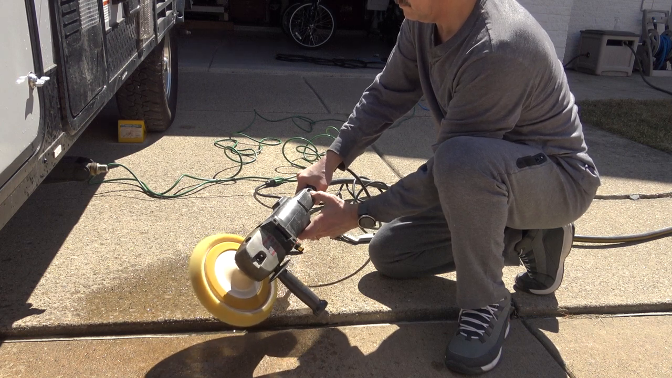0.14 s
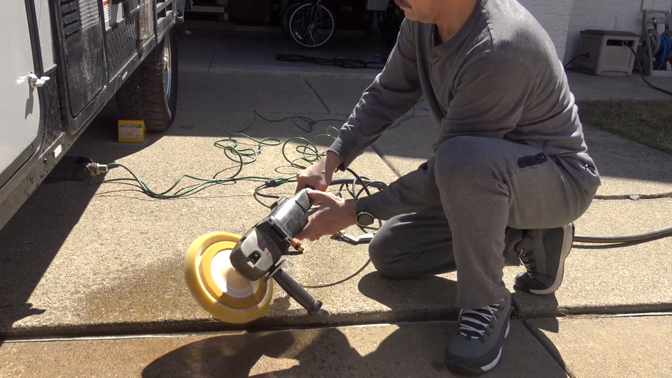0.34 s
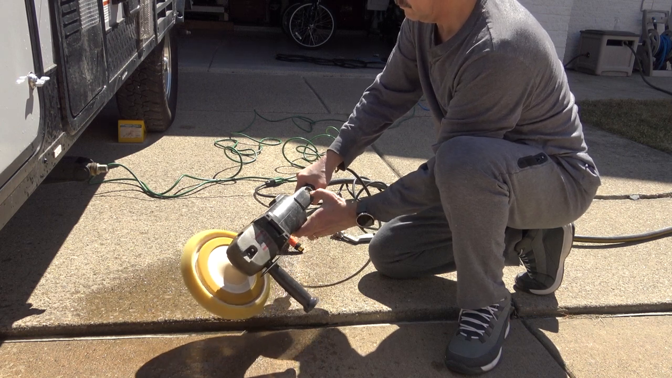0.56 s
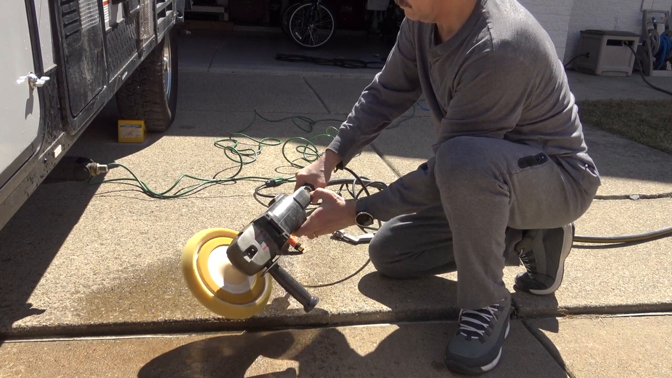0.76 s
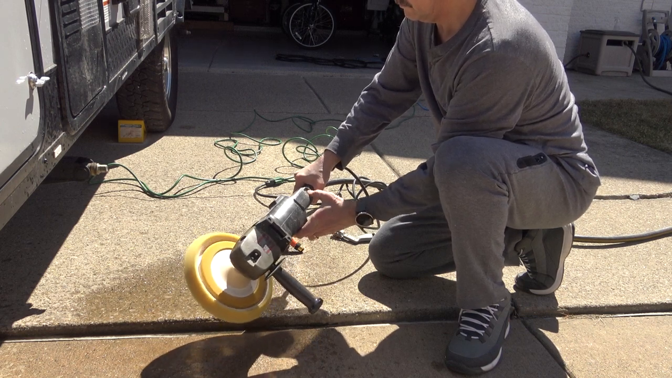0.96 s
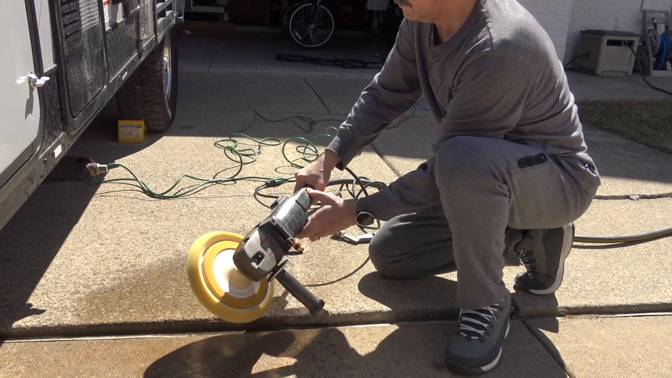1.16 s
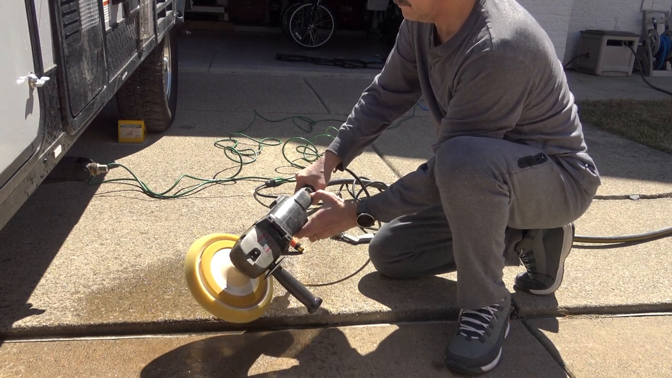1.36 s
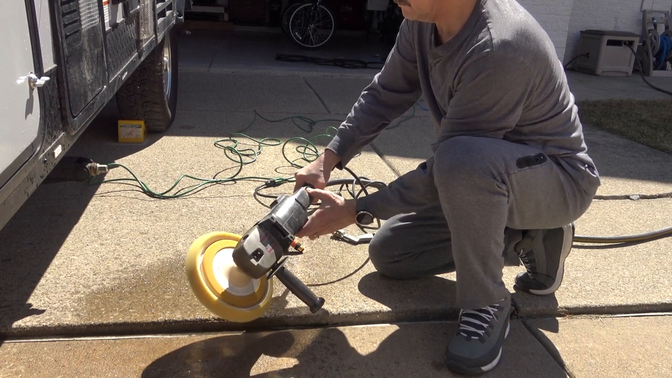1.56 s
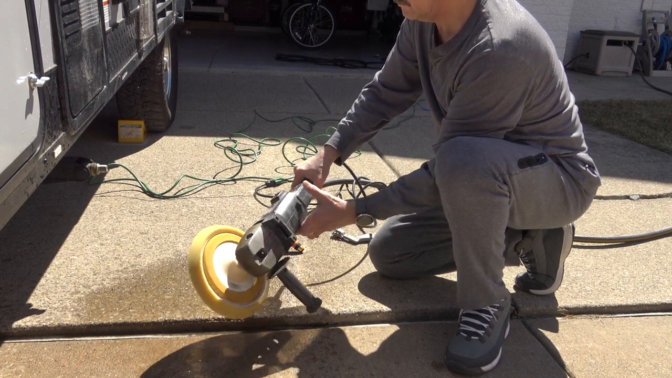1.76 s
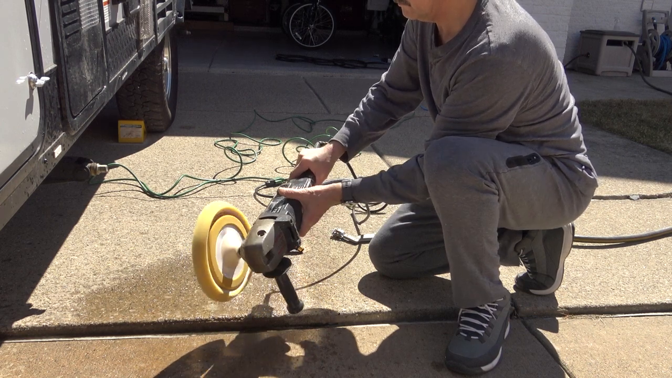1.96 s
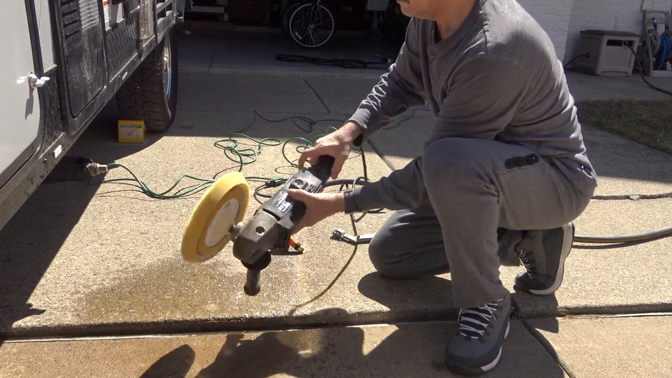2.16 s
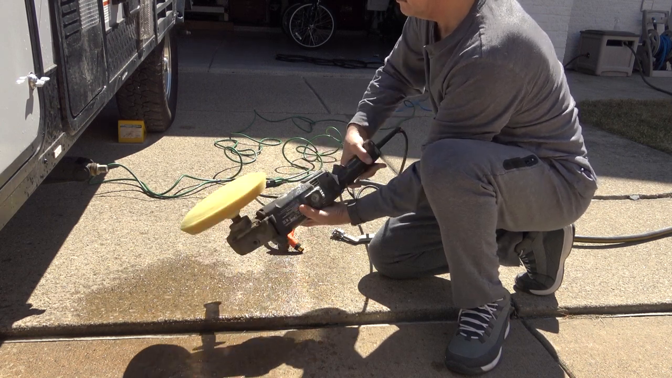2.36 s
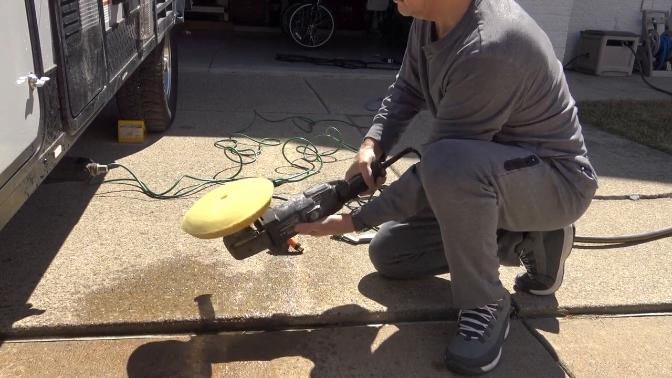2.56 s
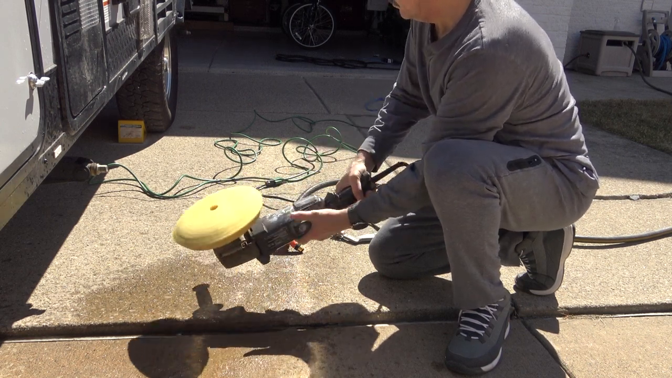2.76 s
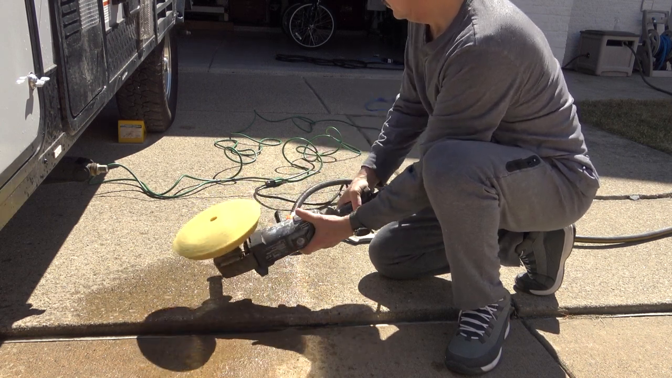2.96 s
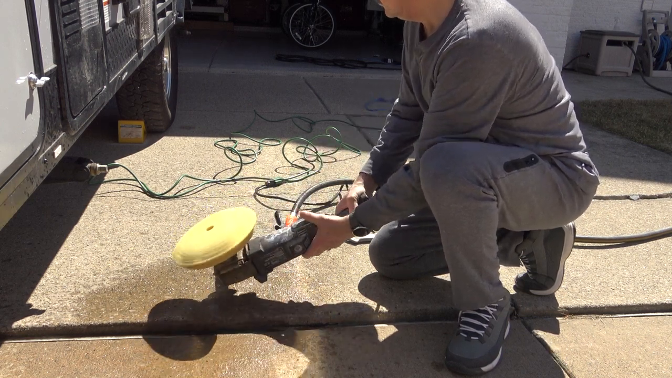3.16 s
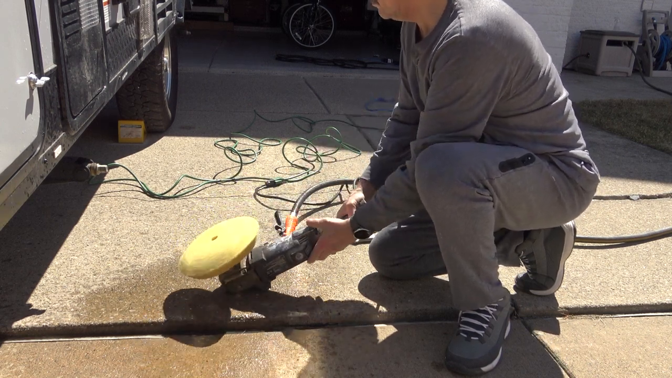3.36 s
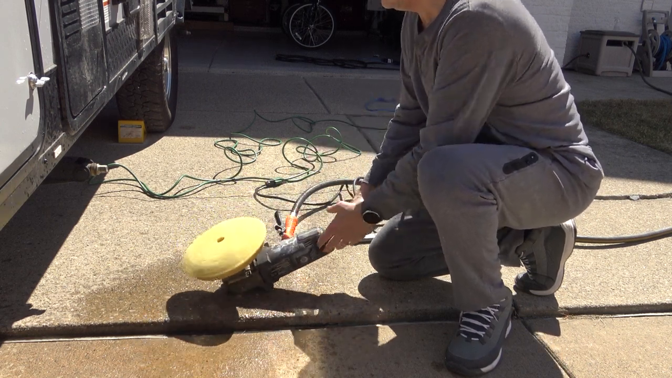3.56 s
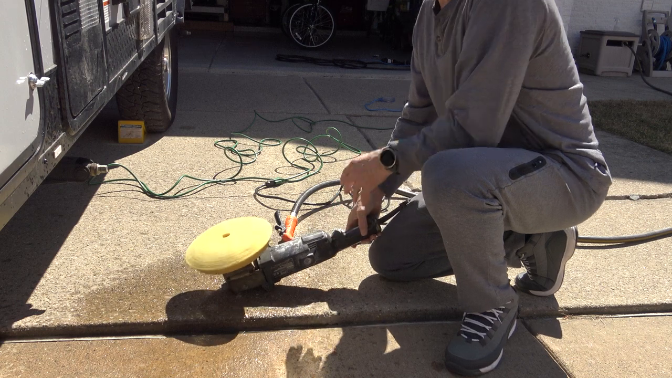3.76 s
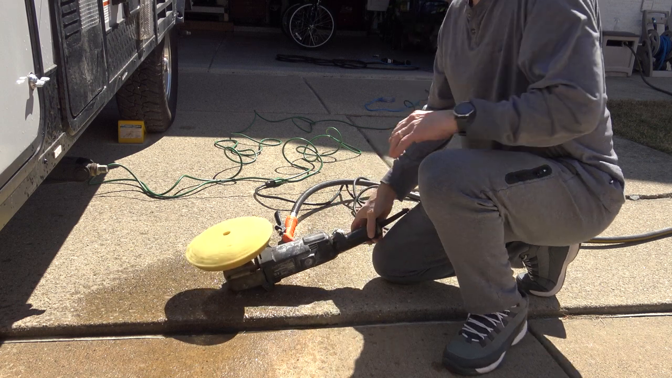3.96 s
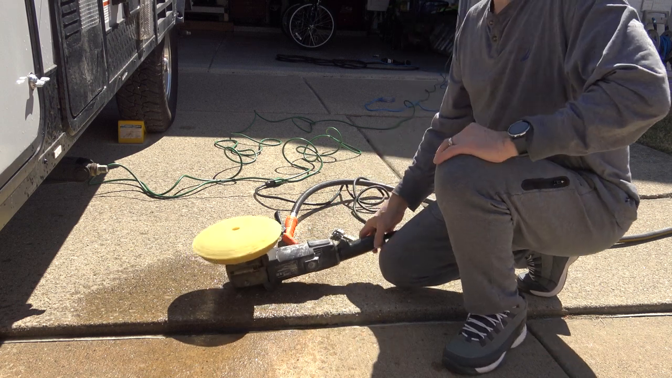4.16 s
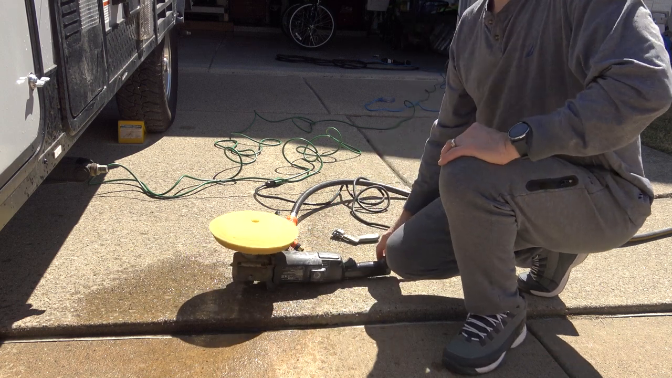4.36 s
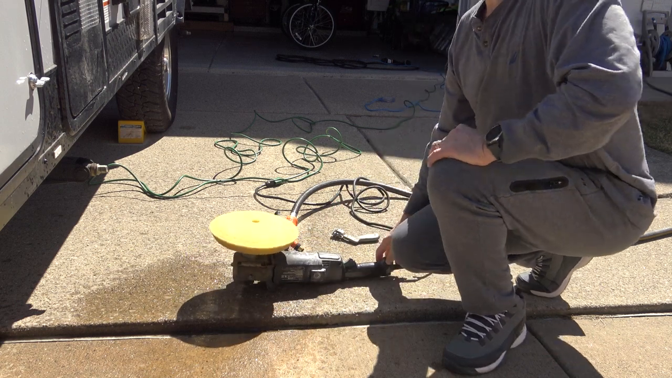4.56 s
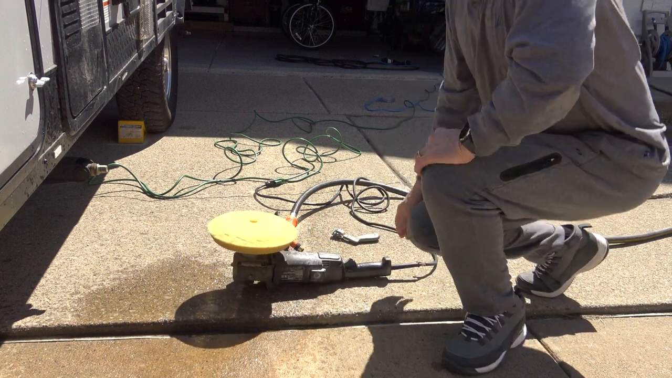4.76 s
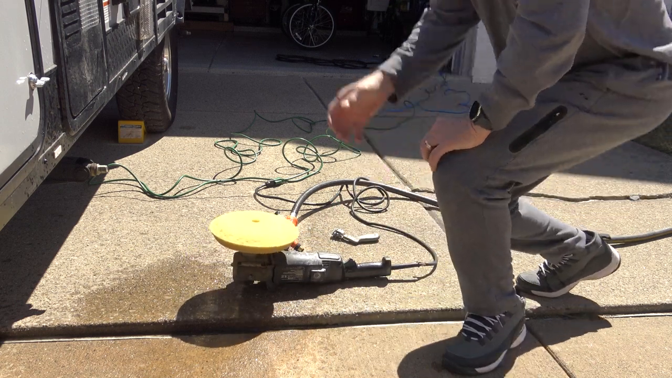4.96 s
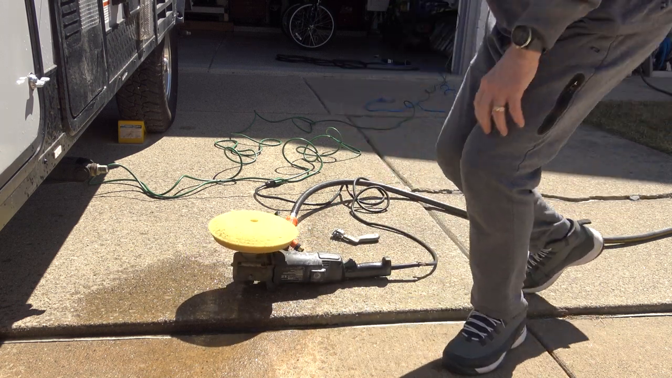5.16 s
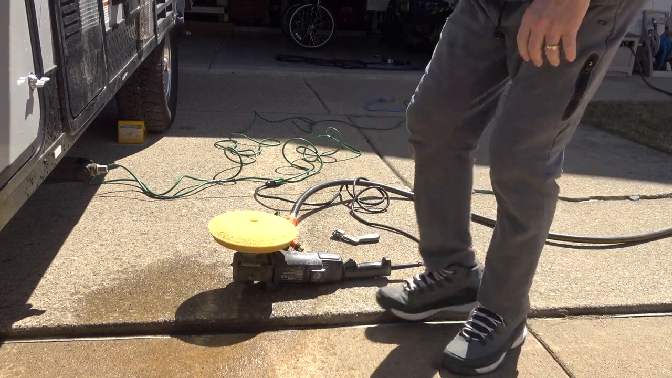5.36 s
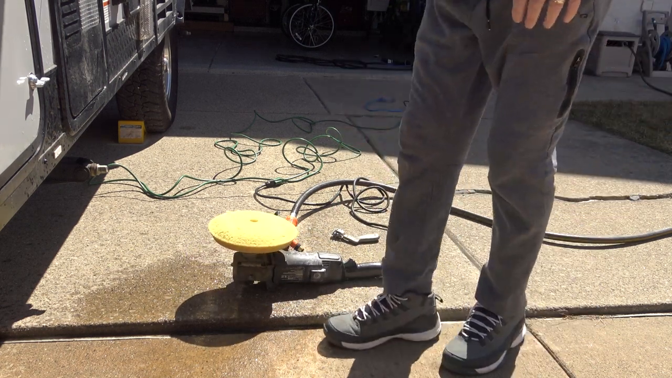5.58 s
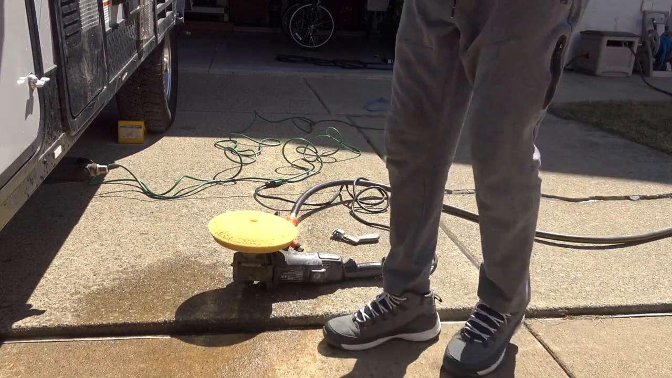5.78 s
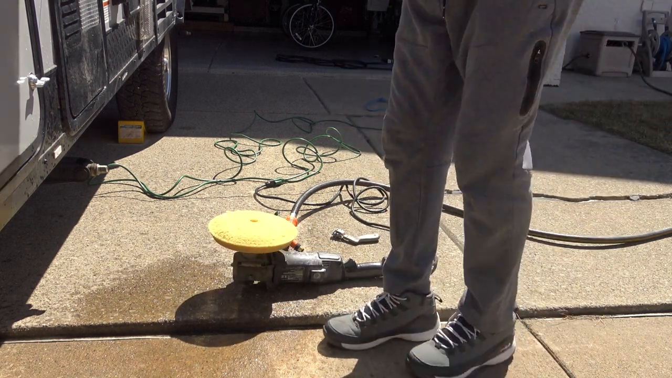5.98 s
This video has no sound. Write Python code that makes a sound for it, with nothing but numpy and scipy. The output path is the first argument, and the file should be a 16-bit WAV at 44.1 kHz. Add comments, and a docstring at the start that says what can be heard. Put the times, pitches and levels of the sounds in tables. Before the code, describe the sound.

Close by outdoors, a power polisher's shrill whine and fan rush sink steadily in pitch, gears clattering ever slower until it halts, followed by gritty footsteps.

```python
"""Armature whines and fan rush of a hand-held electric polisher, running free close to the microphone on a
concrete drive; it is switched off and coasts to a stop. Slots and commutator bars give near sines, fan and
rub are shaped noise, and the bevel gear sings once per spindle turn, then knocks in its slack. Afterwards
shoes shift on grit, slightly left; a low rumble of handling and wind and far outdoor hum lie below."""
import sys
import numpy as np
from scipy import signal
from scipy.fft import rfft, irfft
from scipy.io import wavfile
from scipy.ndimage import map_coordinates

SR = 44100
rng = np.random.default_rng(int(sys.argv[2]) if len(sys.argv) > 2 else 0)


def makeup_ratio(level_db):
    """Linear amplitude ratio for a level in decibels (20 dB per factor of ten)."""
    decades = np.asarray(level_db, float) / 20
    return 10 ** decades


def generate_wav(sig):
    """Save sig (samples, or channels by samples) to the path in sys.argv[1] as 16-bit PCM at SR."""
    pcm = np.round(np.clip(np.atleast_2d(sig).T, -1, 1) * 32767).astype(np.int16)
    wavfile.write(sys.argv[1], SR, pcm)


N = 265482

# low rumble of handling and wind at the microphone: start_s, level_db
LOW_RUMBLE_LEVEL = [(0.0, -54.5), (1.91, -75), (2.08, -39), (2.3, -53), (3.34, -46.5), (3.6, -31),
                    (3.74, -49), (3.97, -36), (4.06, -45), (4.29, -40), (4.66, -49), (5.31, -44.5),
                    (6.02, -47)]
# spectrum of that rumble: frequency_hz, density_db (relative, per Hz)
LOW_RUMBLE_SPECTRUM = [(12, -46), (20, -13), (48, 2), (97, 2.5), (187, -6), (290, -18), (480, -120)]
# far outdoor hum: frequency_hz, density_db (relative, per Hz)
OUTDOOR_SPECTRUM = [(150, -32.5), (400, -8.5), (900, -14), (1600, -21), (2600, -27), (6000, -33),
                    (16000, -40.5)]
OUTDOOR_DB = -48.5

# shoes on concrete: start_s, nominal peak_db, sole_hz at the start, grit_db against peak
SHOE_STEPS = [(5.561, -10, 477, -43), (5.583, -25, 303, -10), (5.799, -33.5, 185, -2),
              (5.82, -14.5, 240, -11), (5.848, -29, 272, -9), (5.903, -35, 191, 5.5), (5.93, -16, 282, -21)]

# the tool is set on the concrete: start_s, peak_db, thump_hz at the start
SET_DOWN_THUMPS = [(3.459, -16, 300), (3.483, -19, 386)]
# resonances of the casing on the ground: pitch_hz, width_hz, level_db
REST_RESONANCES = [(1470, 60, 6), (1760, 380, 2.5), (2284, 220, -3.5), (4960, 290, -17), (8800, 370, -22)]
# level of the rub ringing in them: start_s, level_db
REST_WHIRR_LEVEL = [(3.9, -51.5), (4.45, -27), (5.05, -36), (5.2, -42.5), (5.35, -61)]

# armature speed, coasting against steady friction plus fan drag between rows: start_s, turns_hz
ARMATURE_SPEED = [(0.0, 386.2), (0.25, 388.4), (0.38, 385.5), (0.5, 379), (0.7, 343.5), (1.0, 298.1),
                  (1.4, 250.5), (2.0, 196.0), (2.6, 151.9), (3.25, 112.0), (4.0, 71.3), (4.5, 44.4),
                  (4.72, 33.0), (4.82, 28.5), (4.92, 22.3), (5.3, 3)]
DRAG_EQUALS_FRICTION_HZ = 215
# broad sound of the machine: start_s, fan_rush_db, bearing_and_brush_rub_db
RUSH_AND_RUB = [(0.0, -18.5, -21.5), (0.75, -16.5, -17), (1.85, -28.5, -19), (2.56, -26.5, -23),
                (2.9, -47, -24.5), (3.58, -29, -24.5), (4.22, -35.5, -29.5), (4.95, -68, -41.5),
                (5.17, -57, -52), (5.4, -54, -67)]
# fan spectrum at full speed: frequency_hz, density_db (relative, per Hz)
FAN_SPECTRUM = [(150, -23), (770, -24), (1650, -12), (2400, 4), (3200, -3), (7500, -2.5), (10500, -7),
                (13000, -11.5), (16000, -15.5)]
# spectrum of the plain rub: frequency_hz, density_db (relative, per Hz)
RUB_SPECTRUM = [(150, -29), (300, -13), (600, -5), (1200, -3), (2000, -6), (3200, -6.5), (4350, -7),
                (5100, -7.5), (5900, -7.5), (7100, -7), (8300, -8.5), (9250, -11), (10000, -15),
                (12000, -19.5), (16000, -31)]
# resonances of the gear housing: pitch_hz, width_hz, level_db
HOUSING_RESONANCES = [(1840, 284, -0.5), (2598, 100, 9.5), (3274, 57, -14.5), (3580, 96, 3.5),
                      (5196, 680, -7), (8000, 790, -5.5)]
# gear song, fading as the drive load goes: start_s, level_db
SONG_LEVEL = [(0.0, -8), (0.75, -11.5), (1.2, -15.5), (1.85, -28), (3.5, -28.5), (4.3, -68)]
TURNS_PER_SPINDLE, FIRST_TIGHT_SPOT, PINION_TEETH = 9.144, 0.21, 6  # tight spot in spindle turns

# two strongest whines as the machine slows and is turned about: start_s, multiple_12_db, multiple_24_db
MAIN_WHINES = [(0.0, -19, -17), (0.45, -17, -20.5), (0.65, -27, -20.5), (1.02, -18.5, -16.5),
               (1.22, -24.5, -23.5), (1.45, -36, -26.5), (1.55, -32, -26), (1.75, -26.5, -30),
               (1.95, -30, -36), (2.25, -17.5, -31.5), (2.55, -32.5, -35), (2.85, -21.5, -35),
               (3.3, -35, -97), (3.45, -28.5, -37), (3.75, -33, -27.5), (4.05, -39, -43), (4.2, -28, -31.5),
               (4.5, -39, -42), (4.8, -55, -69), (4.95, -71, -44), (5.1, -66, -58)]
# next four, coming and going: start_s, multiple_30_db, multiple_36_db, multiple_42_db, multiple_48_db
CHANGING_WHINES = [(0.0, -44, -49, -56, -56), (1.05, -42, -47, -56, -56), (1.3, -40, -33, -52, -56),
                   (1.62, -43, -39, -58, -50), (1.94, -43, -26, -48, -46), (2.05, -41, -34, -47, -40),
                   (2.22, -40, -43, -55, -49), (2.36, -37, -33, -46, -40), (2.5, -35, -31, -35, -54),
                   (2.65, -33, -44, -29, -50), (2.82, -31, -44, -30, -45), (2.98, -29, -39, -42, -34),
                   (3.15, -42, -45, -46, -42), (3.55, -42, -42, -39, -44), (3.76, -39, -32, -50, -41),
                   (4.2, -36, -36, -44, -50), (4.44, -38, -34, -44, -38), (4.6, -46, -40, -39, -50),
                   (4.76, -56, -52, -46, -40), (4.87, -60, -58, -54, -50), (5.1, -70, -70, -60, -56)]
# weaker whines: multiple of armature turns, level_db at full speed before the casing
WEAK_WHINES = [(18, -35), (54, -48), (60, -45)]
# rotor unbalance: multiple of armature turns, level_db at full speed
ROTOR_UNBALANCE = [(1, -41), (2, -38)]
# how well the casing radiates the weaker whines in the hand: frequency_hz, gain_db
CASING_IN_HAND = [(1500, -10), (2200, -4), (2700, -14), (3100, 0), (3600, -10), (4100, -2), (4700, -6),
                  (5300, 3), (6100, -8), (8200, -1.5), (10500, -7.5), (15000, -32)]
# how well it radiates them lying on the concrete: frequency_hz, gain_db
CASING_ON_GROUND = [(600, -15), (1440, 5), (1900, 0), (2350, 21), (2800, -5), (15000, -32)]
RESTS_FROM_S = 4.45

# knocks timed one by one, loud and faint, some once a spindle turn:
# start_s, nominal peak_db, thud_hz, clack_db against usual, loudest ring_hz
TIMED_KNOCKS = [(1.835, -26, 1330, -3, 2560), (1.874, -13, 1300, -4, 2470), (2.264, -17, 1080, 5, 3300),
                (2.405, -18, 890, 7, 3070), (2.432, -12, 840, -9, 1920), (2.451, -20, 1020, 13, 3000),
                (2.482, -9, 900, 4.5, 1900), (2.53, -21, 900, 8, 3050), (2.567, -6.5, 905, -2.5, 3160),
                (2.625, -9, 860, -1, 3050), (2.702, -18, 910, 6, 2630), (2.724, -10, 950, 2, 2613),
                (2.746, -2.5, 1250, -4.5, 2660), (2.766, -12.5, 870, 1, 2620), (2.819, -13, 790, 9.5, 1620),
                (2.858, -13, 695, 0, 3200), (2.879, -10.5, 780, 4, 2630), (2.928, -18, 920, 7, 3110),
                (2.946, -10, 890, 6, 1700), (2.992, -9.5, 690, -1.5, 3200), (3.017, -13.5, 885, 9, 1670),
                (3.09, -12.5, 845, 6.5, 1610), (3.141, -17, 690, 8, 3320), (3.167, -17, 910, 9, 3360),
                (3.188, -27, 900, 14, 3350), (3.243, -12.5, 740, -3, 3380), (3.262, -11.5, 1400, 0.5, 3330),
                (3.286, -10.5, 1300, 3.5, 3270), (3.339, -16, 1260, 3.5, 1770),
                (3.402, -10.5, 614, 0, 2600), (3.423, -13, 690, 8, 2680), (3.431, -6.5, 634, 2, 2930),
                (3.458, -6.5, 1130, -12, 2560), (3.483, -7.5, 706, -1.5, 2890),
                (3.536, -20.5, 1240, 10.5, 2590), (3.588, -6, 1030, -3, 1810), (3.801, -10, 874, -6, 2730),
                (3.819, -2, 970, -9, 2740), (3.829, -7.5, 907, 1, 1790), (3.858, -12, 940, -5, 3180),
                (3.887, -5, 944, -1.5, 1870), (4.013, -5, 860, -3.5, 1740), (4.037, -6, 910, -6, 1370),
                (4.057, -7.5, 854, -1, 1750), (4.078, -2.5, 944, -7, 2650), (4.091, -8, 830, -3, 1790),
                (4.111, -3, 930, -10, 2620), (4.127, -5, 765, -3, 1900), (4.175, -8, 830, 2, 1840),
                (4.199, -7.5, 757, -3, 1180), (4.213, -10, 694, 0.5, 2670), (4.238, -5.5, 960, -6.5, 1350),
                (4.254, -10, 706, -5, 1180), (4.315, -5.5, 655, -1, 1810), (4.347, -4.5, 1000, -10, 2790),
                (4.364, -8.5, 1280, 0, 1790), (4.385, -11, 980, -1, 1830), (4.415, -9.5, 690, 5, 2020),
                (4.437, -14.5, 680, 5, 950), (4.464, -11.5, 663, 1.5, 1730), (4.499, -14, 1360, 1, 1740),
                (4.54, -16, 690, -2, 1750), (4.666, -19, 990, -2, 1770), (4.716, -23, 1420, 11, 1790),
                (4.73, -16.5, 940, -2, 1830), (4.766, -18, 705, 3.5, 1840), (4.831, -13, 716, -11, 1520),
                (4.909, -16, 630, -11, 1170), (4.986, -14, 616, -6, 1420), (5.032, -14.5, 615, -7, 1450),
                (5.07, -12, 657, -6, 1710), (5.17, -22, 730, -6, 1520)]
# turns on which a weaker second knock leads: spindle turn number
LEADING_TURNS = [57, 58, 59, 63, 64, 65, 67]
# one slack knock on each of these spindle turns; before LIMP_ENDS odd ones are early, even ones late
KNOCK_TURNS, LIMP_ENDS = range(49, 77), 66
TURN_RING_HZ = 2556  # usual loudest ring of the housing


def rms_one(x):
    """Scales x to rms 1."""
    return x / np.sqrt(np.mean(x ** 2) + 1e-20)


def in_time(rows):
    """Draws each column of a timed table as a line through all samples."""
    s, *columns = np.transpose(rows)
    return [np.interp(np.arange(N) / SR, s, column) for column in columns]


def coloured(x, spectrum):
    """Gives x a spectrum drawn on a log-frequency axis; rms 1."""
    hz, level_db = np.transpose(spectrum)
    log_hz = np.log(np.arange(N // 2 + 1) * SR / N + 1)
    return rms_one(irfft(rfft(x) * makeup_ratio(np.interp(log_hz, np.log(hz), level_db)), N))


def drift(rate_hz):
    """Slow chance with rms 1: noise through a double low-pass pole."""
    r = np.exp(-2 * np.pi * rate_hz / SR)
    return rms_one(signal.lfilter([1], [1, -2 * r, r * r], rng.standard_normal(N + SR))[SR:])


def resonance(x, hz, width_hz):
    """One damped resonance, struck or driven by x."""
    r = np.exp(-np.pi * width_hz / SR)
    b = np.array([1, 0, -1]) * (1 - r * r) / 2
    return signal.lfilter(b, [1, -2 * r * np.cos(2 * np.pi * hz / SR), r * r], x + 1e-18)


def swell(rise_s, fall_s):
    """A short envelope of height 1 that rises and dies, with its time axis."""
    t = np.arange(SR // 16) / SR
    shape = (1 - np.exp(-t / rise_s)) ** 2 * np.exp(-t / fall_s)
    return t, shape / shape.max()


def background():
    """Low rumble of handling and wind at the microphone and a smooth far hum, nearly alike on both sides."""
    rumble_db, = in_time(LOW_RUMBLE_LEVEL)
    a, b, c, d = rng.standard_normal((4, N))
    sides = np.array([[1], [-1]])
    rumble = coloured(a, LOW_RUMBLE_SPECTRUM) + 0.08 * sides * coloured(b, LOW_RUMBLE_SPECTRUM)
    hum = coloured(c, OUTDOOR_SPECTRUM) + 0.16 * sides * coloured(d, OUTDOOR_SPECTRUM)
    return makeup_ratio(rumble_db) * rumble * makeup_ratio(-1.2 * sides) + makeup_ratio(OUTDOOR_DB) * hum * makeup_ratio(0.5 * sides)


def yard(x):
    """A few dull echoes from the vehicle side and house walls, other ones on each side."""
    dull = signal.lfilter([0.5], [1, -0.5], x)
    delays_s = np.array([[0.007, 0.019, 0.034], [0.011, 0.023, 0.041]])
    lags = (delays_s * SR).astype(int)
    return np.array([sum(np.roll(dull, lag) for lag in side) for side in lags])


def steps():
    """A sole pushes with a falling thump and a ring that grows with the grit; grit crunches under it."""
    out = np.zeros(N + SR)
    t, push = swell(0.0004, 0.0065)
    t, crunch = swell(0.00086, 0.007)
    bright = signal.butter(2, [1500, 9000], "band", fs=SR, output="sos")
    dull = signal.butter(2, [250, 900], "band", fs=SR, output="sos")
    noises = rng.standard_normal((len(SHOE_STEPS), len(t)))
    for (s, peak_db, hz, grit_db), noise in zip(SHOE_STEPS, noises):
        thump = np.sin(2 * np.pi * hz * t * (1 - 12.5 * t) + np.cumsum(noise) / 30)
        scuff = 1.5 * push * signal.sosfilt(dull, noise)
        ring = makeup_ratio(grit_db / 2 - 7) * np.sin(2 * np.pi * 1350 * t)
        sole = push * (thump + scuff + ring)
        unevenness = makeup_ratio(11.0 * signal.sosfilt(dull, noise[::-1]))
        grit = crunch * unevenness * signal.sosfilt(bright, noise)
        start = round(s * SR)
        out[start:start + len(t)] += makeup_ratio(peak_db - 7.0) * sole + makeup_ratio(peak_db + grit_db - 6.0) * grit
    return out[:N]


def set_down():
    """The tool meets the concrete with short dull thumps sinking in pitch."""
    out = np.zeros(N + SR)
    t, push = swell(0.00041, 0.0017)
    for s, peak_db, hz in SET_DOWN_THUMPS:
        start = round(s * SR)
        thump = push * np.sin(2 * np.pi * hz * t * (1 - 3.5 * t))
        out[start:start + len(t)] += makeup_ratio(peak_db) * thump
    return out[:N]


def armature_speed():
    """Under friction plus square-law drag the arctangent of speed falls evenly."""
    s, hz = np.transpose(ARMATURE_SPEED)
    slope, = in_time(np.transpose([s, np.arctan(hz / DRAG_EQUALS_FRICTION_HZ)]))
    return DRAG_EQUALS_FRICTION_HZ * np.tan(slope)


def housing(x):
    """The gear housing rings in all its resonances at once, with alternating sign."""
    return sum(makeup_ratio(db) * (-1) ** k * resonance(x, hz, width)
               for k, (hz, width, db) in enumerate(HOUSING_RESONANCES))


def rest_whirr():
    """Grains of the rub ring in the casing as it comes to lie on the ground."""
    level_db, = in_time(REST_WHIRR_LEVEL)
    grains = rng.standard_normal(N) * makeup_ratio(2.0 * drift(30))
    rings = sum(makeup_ratio(db) * resonance(grains, hz, width) for hz, width, db in REST_RESONANCES)
    return makeup_ratio(level_db) * rms_one(rings)


def brushes(speed, rub_db):
    """Brushes pass the same worn bars each half turn: faint even multiples, once the fan has slowed."""
    wear = rng.standard_normal((3, 80))  # three patterns of 80 points, each flickering by itself
    half_turns = 2 * np.cumsum(speed) / SR % 1
    buzz = sum(makeup_ratio(5 * drift(4.8)) * map_coordinates(bars, [half_turns * len(bars)], mode="grid-wrap")
               for bars in wear)
    casing = signal.butter(2, [1800, 6500], "band", fs=SR, output="sos")
    heard = np.clip((250 - speed) / 60, 0, 1)
    return makeup_ratio(rub_db - 14) * signal.sosfilt(casing, buzz) * heard


def rub(rub_db):
    """Dense uneven grains from brushes and bearings, partly sung by the housing."""
    grains = rng.standard_normal(N) * makeup_ratio(1.37 * drift(37))
    plain = coloured(grains, RUB_SPECTRUM)
    return makeup_ratio(rub_db) * rms_one(plain + 1.04 * housing(plain))


def fan(speed, rush_db):
    """Turbulence scales with the blades: its whole spectrum sinks with speed."""
    full = coloured(rng.standard_normal(N), FAN_SPECTRUM)
    slowed = map_coordinates(full, [np.cumsum(speed / speed.max())], order=3)
    return makeup_ratio(rush_db + 2.06 * drift(39)) * slowed


def gear_song(speed, song_db):
    """Six pinion teeth ring where the crown wheel runs tight, once a spindle turn, and shake the housing."""
    turns = np.cumsum(speed) / SR
    spindle = 2 * np.pi * (turns / TURNS_PER_SPINDLE + FIRST_TIGHT_SPOT + 0.04 * drift(20))
    tight = np.exp(10.0 * (np.cos(spindle) - 1)) + 0.19 * makeup_ratio(1.3 * drift(58))
    teeth = np.sin(2 * np.pi * PINION_TEETH * turns + 0.8 * drift(60))
    wobble_db = 1.5 * drift(20)
    shake = rms_one(housing(tight * rng.standard_normal(N)))
    return makeup_ratio(song_db + wobble_db) * (tight * teeth + 0.097 * shake)


def whines(speed):
    """Slots, bars and unbalance give near sines on multiples of the armature turns, with drifting level."""
    angle = 2 * np.pi * np.cumsum(speed) / SR
    resting = np.arange(N) / SR > RESTS_FROM_S
    halvings = np.log2(speed / speed.max())  # negative as it slows
    levels = in_time(MAIN_WHINES) + in_time(CHANGING_WHINES)
    voices = [(k, db + 2 * drift(14)) for k, db in zip((12, 24, 30, 36, 42, 48), levels)]
    for k, db in WEAK_WHINES:
        in_hand_db = np.interp(k * speed, *np.transpose(CASING_IN_HAND))
        on_ground_db = np.interp(k * speed, *np.transpose(CASING_ON_GROUND))
        casing_db = np.where(resting, on_ground_db, in_hand_db)
        voices.append((k, db + 1.5 * halvings + casing_db + 4 * drift(7)))
    voices += [(k, db + 7 * halvings + drift(3)) for k, db in ROTOR_UNBALANCE]
    out = 0
    for k, level_db in voices:
        audible = np.clip((15800 - k * speed) / 500, 0, 1)  # silent above 15.8 kHz
        phase = k * angle + (0.3 + 0.012 * k) * drift(30)
        out = out + np.sqrt(2) * audible * makeup_ratio(level_db) * np.sin(phase)
    return out


def thud_pitch(speed):
    """The thud follows the tooth rate, but the housing sets a floor under it."""
    lowest_hz = 1082
    return np.maximum(PINION_TEETH * speed, lowest_hz)


def turn_knocks(speed, spindle):
    """Slack is taken up once a spindle turn, limping at first: rows of start_s, peak_db, thud_hz."""
    turn = np.array(KNOCK_TURNS)
    limp = np.where(turn % 2, -0.05, 0.06) * (turn < LIMP_ENDS)  # in spindle turns
    s = np.interp(turn + limp, spindle, np.arange(N) / SR)
    level, pitch = rng.standard_normal((len(turn), 2)).T
    thud_hz = thud_pitch(speed[(s * SR).astype(int)]) * (1 + 0.08 * pitch)
    return np.transpose([s, -6 + 1.2 * level, thud_hz])


def leading_knocks(speed, spindle):
    """A weaker knock comes a third of a turn ahead: rows of start_s, peak_db, thud_hz."""
    s = np.interp(np.array(LEADING_TURNS) - 0.34, spindle, np.arange(N) / SR)
    return [(at, -11, thud_pitch(speed[int(at * SR)])) for at in s]


def soft_rattle():
    """Loosely spaced soft knocks lie between the others: rows of start_s, peak_db, thud_hz."""
    from_s, to_s, per_s = 1.9, 4.6, 30
    gap, level, pitch = rng.random((200, 3)).T
    s = from_s + np.cumsum(0.4 + 1.2 * gap) / per_s
    rows = np.transpose([s, -23.5 + 4 * level, np.interp(pitch, [0, 1], [635, 1300])])
    return rows[s < to_s]


def knock_rows(speed):
    """All knocks in the columns of TIMED_KNOCKS; tipped over, the housing shows another ring."""
    tilted_from_s, tilted_ring_hz, usual_clack_db = 2.2, 3100, -3
    spindle = np.cumsum(speed) / SR / TURNS_PER_SPINDLE + FIRST_TIGHT_SPOT
    ruled = np.vstack([turn_knocks(speed, spindle), leading_knocks(speed, spindle), soft_rattle()])
    usual = np.zeros((len(ruled), 1)) + [usual_clack_db, TURN_RING_HZ]
    tilted = (ruled[:, 0] > tilted_from_s) & (ruled[:, 0] < SET_DOWN_THUMPS[0][0])
    usual[tilted, 1] = tilted_ring_hz
    return np.vstack([TIMED_KNOCKS, np.hstack([ruled, usual])])


def knocks(speed):
    """Tooth chatter of a few ms: a dull thud, a burst at twice the tooth rate, a housing clack and a ring."""
    out = np.zeros(N + SR)
    t, thud = swell(0.0014, 0.0038)
    t, clack = swell(0.0035, 0.0012)
    t, ping = swell(0.00041, 0.0048)
    rows = knock_rows(speed)
    noises = rng.standard_normal((300, len(t)))
    contact = signal.butter(2, 7000, fs=SR, output="sos")  # low-pass of the contact
    clacks = housing(signal.sosfilt(contact, clack * noises))
    clacks = clacks / np.abs(clacks).max(axis=1, keepdims=True)
    for (s, peak_db, thud_hz, own_db, ring_hz), noise, clack_wave in zip(rows, noises, clacks):
        start = round(s * SR)
        relative_speed = speed[start] / speed.max()
        clack_db = own_db + 2 + 2.8 * np.log2(relative_speed) + 1.5 * noise[0]
        wander = np.cumsum(noise) / 30
        burst_hz = 2 * PINION_TEETH * speed[start]
        # the burst is loud only near the usual ring
        near_ring = 1 / np.hypot(1, (burst_hz - TURN_RING_HZ) / 150)
        burst = near_ring * np.sin(2 * np.pi * burst_hz * t + 0.7 * wander)
        ring = ping * np.sin(2 * np.pi * ring_hz * t + 3.7 * wander)
        low = thud * np.sin(2 * np.pi * thud_hz * t + 2.45 * wander)
        knock = makeup_ratio(peak_db + own_db - 6.5) * ring + makeup_ratio(peak_db - 8.5) * low
        knock += makeup_ratio(peak_db - 3) * np.sqrt(relative_speed) * thud * burst
        knock += makeup_ratio(peak_db + clack_db) * clack_wave
        out[start:start + len(t)] += knock
    return out[:N]


def scene():
    """Polisher close by, a touch left, with faint yard echoes; shoes also a touch left, rumble and hum."""
    speed = armature_speed()
    rush_db, rub_db = in_time(RUSH_AND_RUB)
    song_db, = in_time(SONG_LEVEL)
    turning = np.interp(np.arange(N) / SR, [5.05, 5.3, 5.45], [1, 0.4, 0])  # fades out at the stop
    machine = rest_whirr() + brushes(speed, rub_db) + rub(rub_db) + fan(speed, rush_db)
    machine = turning * (machine + gear_song(speed, song_db) + whines(speed))
    near = machine + knocks(speed) + set_down()
    direct = near * makeup_ratio([[1.15], [-1.15]]) + steps() * makeup_ratio([[0.8], [-0.8]])
    return direct + makeup_ratio(-25) * yard(near) + background()


def band_limit(x):
    """A steep low-pass at the top of the band."""
    return signal.sosfilt(signal.butter(12, 16030, fs=SR, output="sos"), x)


def record(dry):
    """Peaks are slightly rounded, then the top is cut near 16 kHz."""
    rounded = 1.398 * np.tanh(dry / 1.7)
    top_cut = signal.cheby2(12, 60, 16050, fs=SR, output="sos")
    mix = signal.sosfilt(top_cut, rounded)
    return band_limit(mix)


dry = scene()
out = record(dry)
generate_wav(out)
```